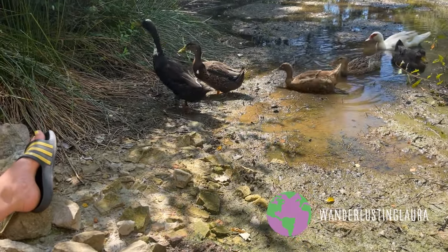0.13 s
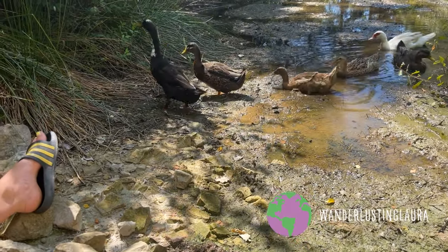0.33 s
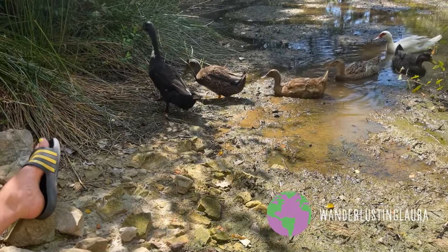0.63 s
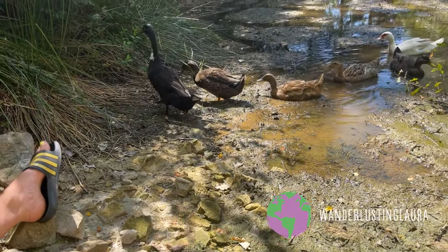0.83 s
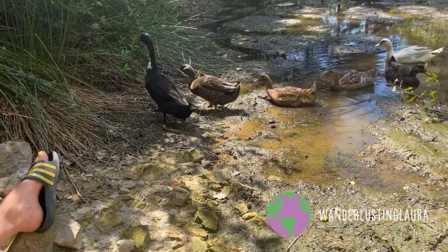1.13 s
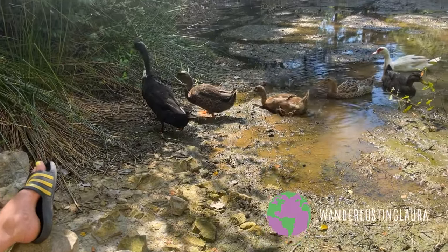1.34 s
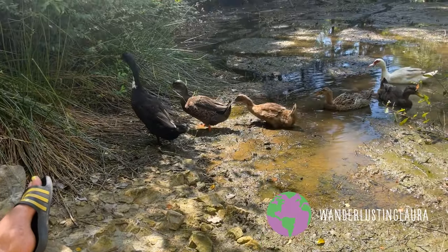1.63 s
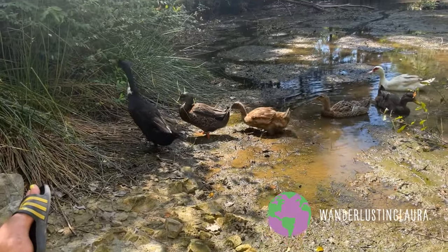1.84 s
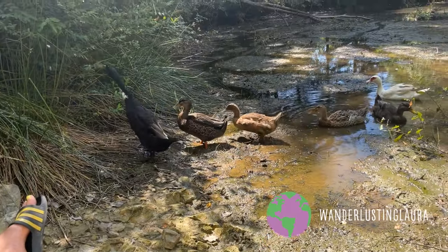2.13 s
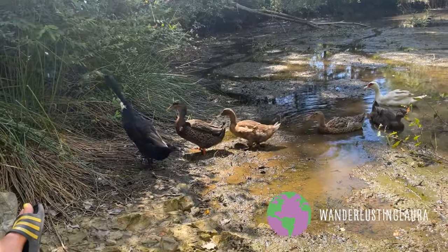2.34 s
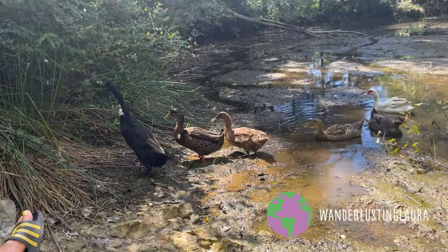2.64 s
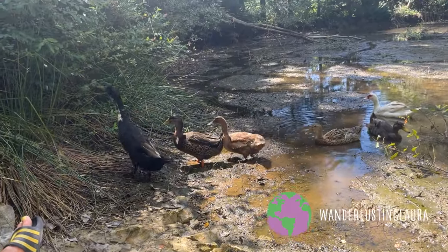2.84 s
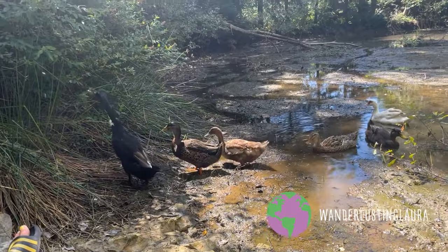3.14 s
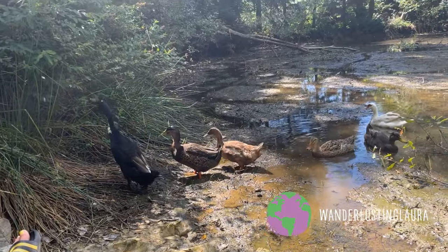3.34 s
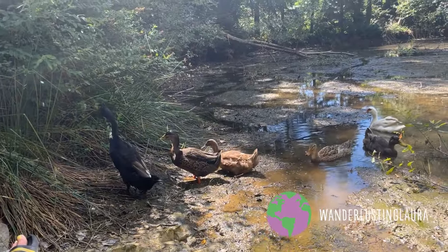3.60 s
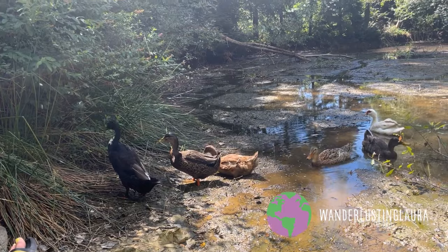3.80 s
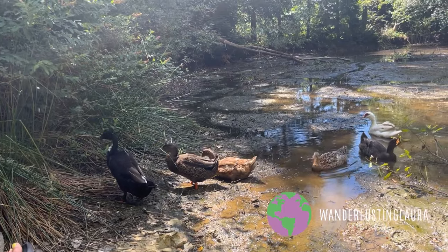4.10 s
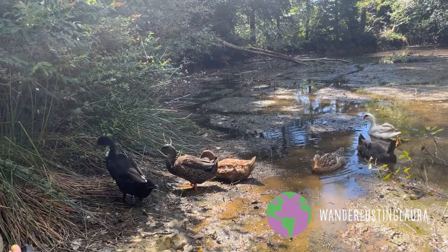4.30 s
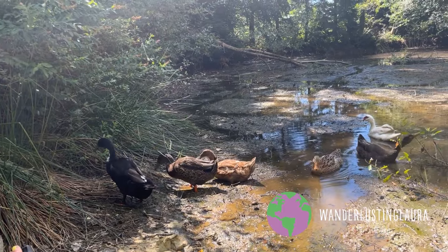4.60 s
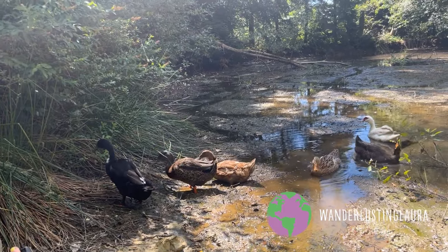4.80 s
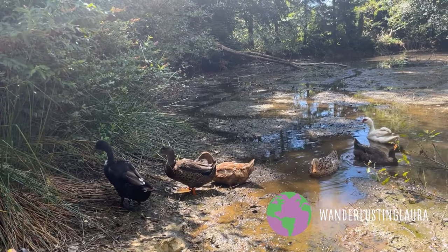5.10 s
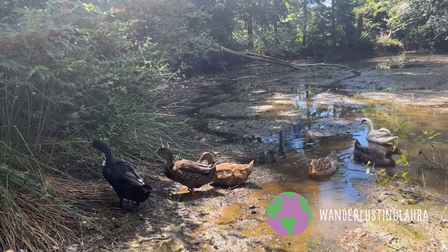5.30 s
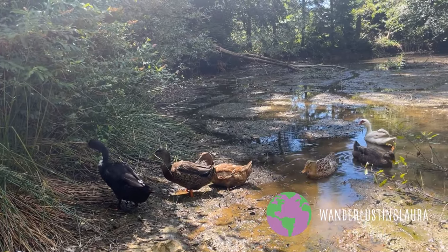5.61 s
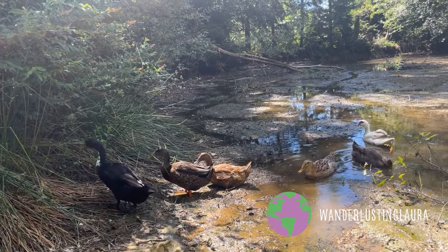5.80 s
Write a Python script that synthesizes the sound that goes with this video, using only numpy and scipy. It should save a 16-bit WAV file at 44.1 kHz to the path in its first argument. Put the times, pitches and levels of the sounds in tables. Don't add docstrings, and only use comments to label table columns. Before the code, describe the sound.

Several ducks a few steps away at a pond edge give short creaky quacks, closest together in the first two seconds, then sparser. Bills and feet slap, drip and squelch in mud and shallow water. Deep wind buffets the phone microphone strongly at first, drops to a lull from two seconds, then thumps again after about four. Thin outdoor hiss and faint insect trills lie behind.

```python
import sys
import numpy as np
from scipy import signal
from scipy.fft import rfft, irfft
from scipy.io import wavfile
from scipy.ndimage import uniform_filter1d

SR = 44100
rng = np.random.default_rng(int(sys.argv[2]) if len(sys.argv) > 2 else 0)


def gain_from_db(level_db):
    decades = np.asarray(level_db, float) / 20
    return 10 ** decades


def inscribe(sig):
    pcm = np.round(np.clip(np.atleast_2d(sig).T, -1, 1) * 32767)
    wavfile.write(sys.argv[1], SR, pcm.astype(np.int16))


N = 262395


def evened(x):
    return x / np.sqrt(np.mean(x ** 2) + 1e-20)


def read(points, hz):
    f, value = np.transpose(points)
    return np.interp(np.log(hz + 1), np.log(f + 1), value)


def add(mix, s, sound):
    part = mix[:, max(round(s * SR), 0):][:, :sound.shape[1]]
    part += sound[:, :part.shape[1]]


def sides(pan_db):
    return gain_from_db(np.array([pan_db / 2, -pan_db / 2]))


def resonate(x, hz, *widths_hz):
    turn = np.exp(2j * np.pi * np.cumsum(hz * np.ones(x.shape[-1])) / SR)
    for width_hz in widths_hz:
        r = np.exp(-np.pi * width_hz / SR)
        x = 2 * (turn * signal.lfilter([1 - r], [1, -r], x / turn)).real
    return x


def two_channels(size, shared_gain, own_gain):
    return shared_gain * rng.standard_normal(size) + own_gain * rng.standard_normal((2, size))


# f/Hz, correlation
LIKENESS = [(60, 0.93), (130, 0.73), (290, 0.67), (640, 0.26), (1410, 0.059), (3100, 0.15), (8600, 0.144),
            (15000, 0.046)]


def noise(colour_db, size, patchy_db, cells):
    hop = size // 4
    hz, s = np.fft.rfftfreq(size, 1 / SR), np.arange(N // hop + 5) * hop / SR
    a, b, c, d, patches = rng.standard_normal((len(s), len(hz), 5)).T
    patches = uniform_filter1d(patches, cells[0], 0)
    patches = evened(uniform_filter1d(patches, cells[1], 1))
    same = np.clip(read(LIKENESS, hz), -1, 1)[:, None]
    left = a + 1j * b
    right = same * left + np.sqrt(1 - same ** 2) * (c + 1j * d)
    level_db = colour_db(hz[:, None], s) + patchy_db * patches
    return np.array([left, right]) * gain_from_db(level_db), hz


def gust(s, peak_db, hz, cycles=2.49):
    u = np.linspace(0, 1, round(cycles / hz * SR))
    swell = np.sin(np.pi * u ** .6) ** 1.3 * (1 - np.exp(-(u / .06) ** 2))
    phase, skew = rng.uniform(0, 2 * np.pi), 0.87 * rng.standard_normal()
    turn = 2 * np.pi * cycles * (1.379 * u - 0.49 * u ** 2) + phase + np.array([[0], [skew]])
    wave = np.sin(turn) + 0.22 * np.sin(2.307 * turn) + 0.051 * (1 - u) * np.sin(3.874 * turn)
    return s, gain_from_db(peak_db) * swell * wave


# t/s, level/dB
WIND = [(0.0, -28.5), (0.23, -35.5), (0.95, -29), (1.34, -27), (1.8, -32.5), (2.0, -49.5), (2.3, -52.5),
        (2.62, -47.5), (3.3, -40.5), (3.7, -41.5), (4.14, -41.5), (4.361, -33.5), (5.0, -36.5),
        (5.45, -40.5), (5.95, -38.5)]
# f/Hz, level/dB per Hz
RUMBLE = [(13, -27), (22, 3.5), (43, -3), (69, 1), (104, -7.5), (230, -30), (363, -42), (450, -49),
          (580, -39), (990, -120)]
# t/s, peak level/dB, f/Hz
GUSTS = [(0.08, -15, 51), (0.159, -19, 52), (0.24, -18.5, 74), (0.42, -19.5, 47.3), (0.515, -15.5, 59.6),
         (0.626, -21, 71), (0.737, -12.5, 54.9), (0.78, -20, 76.4), (1.066, -26, 55), (1.161, -10.5, 65.7),
         (1.249, -20, 83.3), (1.31, -13.5, 49), (1.385, -15.5, 57.5), (1.469, -15.5, 53.4),
         (1.657, -20.5, 92.6), (1.698, -15, 55), (1.769, -12.5, 60.7), (3.22, -25.5, 69.2),
         (3.392, -24.5, 97), (3.487, -23, 81.5), (4.31, -24.5, 86), (4.432, -10.5, 59.7),
         (4.486, -21.5, 48.7), (4.678, -26, 78), (4.797, -9.5, 59.2), (4.93, -23.5, 53.3),
         (5.116, -21, 63.4), (5.207, -20.5, 59.9), (5.629, -23, 61), (5.784, -13.5, 64.8),
         (1.88, -36, 55.2), (1.945, -27.5, 75), (2.005, -32, 60), (2.126, -30.5, 70), (2.196, -32, 69),
         (2.36, -36.5, 60), (2.446, -29.5, 57), (2.515, -28, 77.6), (2.665, -26.5, 63), (2.84, -31, 88.8),
         (3.03, -33, 88), (3.334, -32.5, 75), (3.679, -35, 55.4), (3.738, -33, 60), (3.795, -29, 65),
         (3.944, -26, 81), (4.07, -33, 62), (4.166, -26, 66), (4.24, -32, 69.6), (5.329, -31, 60.5),
         (5.481, -30, 71), (.9, -25, 71), (.98, -21, 75), (3.58, -35, 81), (4.58, -32, 65),
         (5.029, -33, 60.6), (5.551, -29, 63.5), (5.88, -32, 60)]


def wind():
    s, strength_db = np.transpose(WIND)
    z, hz = noise(lambda hz, t: read(RUMBLE, hz) + 0 * t, size=2048, patchy_db=1.5, cells=(6, 8))
    x = evened(signal.istft(z, nperseg=2048, noverlap=1536)[1][:, :N])
    x = evened(x + x[::-1] / 6)
    x *= gain_from_db(np.interp(np.arange(N) / SR, s, strength_db) + 5.0)
    for row in GUSTS:
        add(x, *gust(*row))
    low_cut = signal.butter(3, 38, "high", fs=SR, output="sos")
    return signal.sosfilt(low_cut, x) * sides(-3.05)[:, None]


# t/s, level/dB
STIR = [(0.0, 5), (0.89, 2.5), (1.06, 6), (1.19, 10), (1.31, 7), (1.44, 12), (1.72, 8.5), (1.94, 7),
        (2.17, 8), (2.47, 3.5), (2.82, 6), (3.02, 5.5), (3.46, 8.5), (3.65, 2.5), (4.22, 5), (4.54, 2.5),
        (5.6, 7.5), (5.95, 6)]
# f/Hz, level/dB per Hz
AIR = [(82, -45), (140, -3), (200, 12), (508, -7.5), (595, -8), (1290, -9.5), (4590, -21), (5480, -21.5),
       (6560, -27), (9370, -25), (11400, -30.5), (12400, -49), (14500, -39.5), (16000, -49)]
# f/Hz, left-right level/dB
SIDES = [(500, -0.5), (5000, 4), (15000, -3)]


def air():
    s, stir_db = np.transpose(STIR)
    hiss_db, hiss_share, fizz_share = 7.5, 0.18, 1.46

    def top(hz):
        return np.clip(np.log2(hz / 2200 + 1e-9), 0, 1)

    def colour_db(hz, t):
        above_rumble = np.clip(np.log2(hz / 250 + 1e-9), 0, 1)
        middle_db = np.interp(t, s, hiss_db + hiss_share * stir_db)
        fizz_db = np.interp(t, s, fizz_share * stir_db)
        return read(AIR, hz) + above_rumble * ((1 - top(hz)) * middle_db + top(hz) * fizz_db)

    z, hz = noise(colour_db, size=512, patchy_db=1.6, cells=(6, 12))
    top_and_dip_db = 13 * (hz > 13800) - 10 * np.exp(-((hz - 6600) / 200) ** 2)
    z *= gain_from_db(top_and_dip_db)[:, None]
    z *= sides(read(SIDES, hz))[:, :, None]
    flicker_db = .9 * rng.exponential(1, z.shape[2])
    z *= gain_from_db(flicker_db * top(hz)[:, None])
    return gain_from_db(-39.0) * signal.istft(z, nperseg=512, noverlap=384)[1][:, :N] / 16


# start t/s, end t/s, level/dB
TRILLS = [
    (.37, .6, -68),
    (2.56, 2.8, -70),
    (3.14, 3.36, -71),
    (4.26, 4.5, -69),
    (5.08, 5.3, -70),
]


def trill(start, end, level_db):
    t = np.arange(0, end - start, 1 / SR)
    strokes = np.maximum(np.sin(2 * np.pi * 90 * t), 0) + 1.6
    hz = 7300 - 350 * np.sqrt(t / t[-1])
    note = resonate(strokes * two_channels(len(t), 1, 1), hz, 170, 170)
    fade = gain_from_db(level_db - 9 * t / t[-1]) * signal.windows.tukey(len(t), .2)
    return start, evened(note) * fade


# t/s, peak level/dB, f/Hz, length/s, relative glide over the length
BUBBLES = [
    (0.115, -40, 863, 0.0287, 0.31),
    (0.463, -43, 1166, 0.025, -0.24),
    (0.485, -39, 685, 0.0227, -0.084),
    (0.6, -35.5, 754, 0.0067, 0.27),
    (1.405, -29.5, 820, 0.0033, 0.193),
    (1.502, -44.5, 940, 0.029, -0.326),
    (1.883, -27.5, 748, 0.0017, -0.2),
    (1.916, -27, 882, 0.021, -0.226),
    (3.542, -43, 1960, 0.0062, 0.063),
    (5.74, -46.5, 1249, 0.0222, -0.00095),
]
# t/s, peak level/dB, f/Hz, length/s, relative glide
DRIPS = [(.342, -49, 2600, 0.0044, -.1), (.399, -46, 1340, .006, 0.14), (0.469, -48.5, 2300, 0.0093, 0.25),
         (.756, -50, 3300, 0.0051, 0.028), (1.019, -42.5, 1350, .006, 0.098), (1.121, -42, 2700, .005, .04),
         (1.203, -44.5, 2800, 0.015, -0.0016), (1.258, -45, 2670, 0.0058, 0.023),
         (1.262, -44, 1213, 0.007, 0.12), (2.415, -50, 3600, .004, 0.034), (2.662, -49, 1530, 0.011, .05),
         (2.697, -40, 1800, 0.0066, 0.072), (2.85, -46.5, 2890, 0.00385, 0.18),
         (2.906, -43.5, 2094, .007, .1), (4.69, -47.5, 2600, .007, 0.068), (4.857, -33, 1930, 0.0033, 0.28),
         (4.861, -34.5, 2430, 0.006, 0.24), (4.99, -43, 2450, .01, 0.12), (5.003, -49, 3600, 0.0035, 0.11),
         (5.036, -53, 3660, 0.0055, .03), (5.495, -49, 2500, 0.0108, 0.1), (5.513, -53, 2900, .008, 0.013),
         (5.618, -50, 2420, 0.013, 0.23), (5.707, -46.5, 4900, 0.0049, 0.0056),
         (5.87, -47, 3373, 0.0069, 0.078), (5.87, -44, 1810, .006, .05),
         (1.007, -33.5, 3550, 0.0051, 0.014), (1.008, -31, 2110, 0.0046, 0.026),
         (2.824, -47.5, 3600, 0.0063, 0.011), (2.825, -47, 4500, 0.0047, .03),
         (2.917, -26, 3630, .006, 0.054), (2.7, -51, 3800, 0.0072, 0.048), (2.098, -42.5, 1600, 0.0054, .1),
         (2.262, -48, 3400, .01, 0.037), (1.885, -50, 1910, 0.035, .5), (.378, -47, 2300, 0.0048, -0.087),
         (5.136, -51, 2700, .005, .1), (5.212, -50, 5300, 0.0049, 0.11), (.583, -49.5, 2000, 0.01, .15),
         (3.429, -35, 3700, 0.0037, 0.011)]


def bubble(s, peak_db, hz, length, glide):
    u = np.linspace(0, 1.4, round(abs(length) * 1.424 * SR) + 2)
    turn = 2 * np.pi * hz * length * u * (1 + glide * u / 2)
    swell = np.sin(np.pi * u / 1.4) ** 2.0
    return s - .002, gain_from_db(peak_db) * swell * np.sin(turn + np.array([[0], [.4]]))


# t/s, peak level/dB, cavity f/Hz
SQUELCHES = [(.06, -40, 593), (0.148, -35, 555), (0.19, -33.5, 452), (0.929, -29.5, 594), (1.461, -33, 695),
             (2.615, -34, 570), (2.633, -36, 516), (2.673, -34.5, 816), (2.916, -38, 750),
             (3.341, -43, 467), (3.372, -36.5, 298), (3.437, -30.5, 870), (3.491, -40, 340),
             (4.046, -40, 318), (4.174, -32.5, 537), (4.596, -41.5, 340), (4.878, -37, 376)]


def squelch(s, peak_db, hz):
    t = np.arange(round(0.034 * SR)) / SR
    puff = two_channels(len(t), 0.75, 1) * t / .004 * np.exp(-t / 0.0054)
    cavity = resonate(resonate(puff, hz * (1 - 12.2 * t), 240), hz, 670)
    body = cavity + .5 * resonate(resonate(puff, 210, 1100), 210, 1100)
    return s - .002, gain_from_db(peak_db + 3.0) * body / np.abs(body).max()


# t/s, peak level/dB, ring f/Hz, spray level above 5 kHz in steps of 2.02 dB
SLAPS = [(0.2344, -37, 3310, -38), (1.007, -33.5, 2090, -27.5), (1.008, -37, 3420, -20),
         (1.203, -31.5, 5860, -3), (1.3248, -41.5, 3830, 0.5), (1.334, -30.5, 2500, -23),
         (1.359, -29, 1400, -27.5), (1.369, -46.5, 2320, 3.5), (1.7906, -25, 2440, -11),
         (2.174, -36.5, 2870, -2.5), (2.2116, -19, 2950, -4), (2.2136, -21, 1920, -27),
         (2.4025, -39, 1670, -10), (2.918, -19, 2680, -6), (3.1156, -55, 2080, 4), (3.3725, -27, 3600, -9),
         (3.3903, -28.5, 2650, -7), (3.402, -28.5, 2730, -22), (3.414, -29.5, 2040, -25),
         (3.4294, -21, 3760, -39), (3.4379, -18.5, 1750, -4), (3.4672, -30.5, 1600, -34),
         (3.959, -55, 3200, 3.5), (4.218, -51, 2260, 2), (4.7008, -36.5, 2950, -33),
         (4.754, -45, 3230, -0.5), (4.8564, -34.5, 1900, -4.5), (4.8624, -43, 4840, -27.5),
         (5.0035, -40.5, 2500, -2), (5.5117, -40.5, 2900, -2)]
# t/s, peak level/dB, ring f/Hz
DABS = [(0.02, -43, 5620), (0.3017, -41, 2840), (0.3363, -39, 3100), (0.3576, -45, 3920),
        (0.878, -40, 4700), (1.327, -33.5, 1740), (1.8124, -40, 4500), (2.0518, -38.5, 3300),
        (2.154, -43.5, 2760), (2.262, -52, 3300), (2.2812, -42, 2200), (2.3105, -38, 3310),
        (2.6717, -42.5, 3370), (2.825, -40.5, 1870), (2.9882, -38.5, 1870), (4.5662, -41.5, 3240),
        (4.768, -39, 2800), (4.979, -44, 2080), (5.1126, -46, 1890), (5.1266, -41.5, 1990),
        (3.358, -43, 3340), (5.3832, -41, 2090), (5.4872, -37, 2060), (5.6091, -38, 2264),
        (5.6294, -43, 1940), (5.705, -43.5, 3600), (1.5618, -43, 5230), (4.745, -46, 3520)]
# t/s, peak level/dB
FLICKS = [(.085, -54.5), (1.131, -48.5), (1.895, -65.5), (2.196, -41.5), (3.612, -56), (3.852, -57),
          (4.044, -58), (4.075, -52.5), (4.26, -57.5), (5.788, -49), (2.605, -64), (1.852, -56),
          (3.68, -63), (3.985, -58), (3.6, -55)]
SLAP_T60_S, DAB_T60_S = 0.016, 0.0087
DAB_SPRAY_DB, FLICK_SPRAY_DB, FLICK_HZ = -9, 2, 4160


def slap(s, peak_db, hz, spray_db, t60_s):
    t = np.arange(round(.09 * SR)) / SR
    attack = 1 - np.exp(-(t / 0.0027) ** 3)
    sizzle = gain_from_db(-33.5 - 60 * t / 0.2)
    burst = attack * (gain_from_db(-60 * t / max(t60_s, .008)) + sizzle)
    drops = two_channels(len(t), 1, 0.53) * burst
    rising_hz = 0.92 * hz + 40000 * np.minimum(t, .012)
    wide = min(gain_from_db(peak_db + 26.5), 4.0)
    ring = resonate(drops, rising_hz, 1450, 850)
    ring += 0.18 * wide * resonate(drops, 3560, 4000, 4000)
    ring += 0.06 * wide * resonate(drops, 1000, 850, 850)
    spray = signal.sosfilt(signal.butter(4, 5000, "high", fs=SR, output="sos"), drops)
    ring /= np.abs(ring).max()
    spray /= np.abs(spray).max()
    lean = sides(0.5 + 0.35 * rng.standard_normal())[:, None]
    return s - .0018, gain_from_db(peak_db + 2.5) * (ring + gain_from_db(2.02 * spray_db) * spray) * lean


# t/s, length/s, level/dB, throat f/Hz, relative climb over the call
RASPS = [(0.943, 0.058, -42.5, 1634, .1), (1.057, 0.049, -41, 1695, .2), (1.097, 0.0313, -43.5, 1730, .02),
         (1.197, 0.061, -39.5, 1620, 0.33), (1.466, .04, -50, 1487, .04), (1.688, .03, -43.5, 1870, .04),
         (4.39, .055, -47, 1710, .04), (2.858, 0.015, -44, 1680, 0.37), (2.89, 0.062, -48, 1360, .04),
         (5.587, 0.025, -51, 1680, .04), (5.69, 0.063, -46.5, 1695, .05)]


def rasp(start, length, level_db, throat_hz, climb, beats_per_s=88, depth=0.26):
    t = np.arange(start - .005, start + length + 0.00275, 1 / SR)
    along = np.linspace(-1, 1, len(t))
    throb = 1 + depth * np.cos(2 * np.pi * beats_per_s * t)
    breath = two_channels(len(t), 1, .5) * throb
    hz = throat_hz * (1 + climb * along / 2)
    voice = resonate(breath, hz, 340, 403)
    voice += gain_from_db(-17.5) * resonate(breath, 1.33 * hz, 200, 200)
    ends_db = -6 * abs(along)
    shape = gain_from_db(level_db + ends_db) * signal.windows.tukey(len(t), .3)
    return t[0], evened(voice) * shape * sides(6.7)[:, None]


# first pulse t/s, last pulse t/s, effort level/dB, low throat f/Hz, middle f/Hz
QUACKS = [
    (0.173, 0.226, -35, 1330, 1547),
    (0.898, 0.939, -31, 1240, 1484),
    (1.121, 1.189, -35.5, 1410, 1760),
    (1.427, 1.467, -33.5, 1230, 1415),
    (1.617, 1.692, -34.5, 1195, 1450),
    (1.964, 2.019, -36, 1255, 1610),
    (2.71, 2.764, -34, 1204, 1580),
    (4.049, 4.101, -35, 1306, 1720),
    (4.402, 4.432, -43, 996, 1744),
]
MUTTERS = [
    (.622, 0.675, -27.5, 1290, 1513),
    (2.445, 2.501, -28.5, 1362, 1870),
    (3.794, 3.837, -33.5, 1240, 1550),
]
HONKS = [
    (0.411, .459, -30.5, 1370, 1555),
    (0.853, .893, -40.5, 1050, 1804),
    (1.716, 1.773, -38.5, 1310, 1740),
]
CLUCKS = [
    (4.899, 4.939, -33.5, 1415, 1830),
    (5.171, 5.223, -34.5, 1350, 1800),
]
# f/Hz, level/dB, left-right level/dB
HEAD = [(2800, -19.5, 1.7), (3600, -33, 17), (4500, -33, 13), (5300, -29.5, 8.1)]
OPEN_BILL = dict(mid_db=0.7, bill_db=-6, bill_hz=2193, first_db=-6, top=.5, nasal_db=0)
SHUT_BILL = dict(mid_db=-4.5, bill_db=-16.5, bill_hz=2200, first_db=-5.5, top=.5, nasal_db=-2)
WIDE_BILL = dict(mid_db=-1.5, bill_db=-3.5, bill_hz=2388, first_db=-9.5, top=.5, nasal_db=10)
SHORT_BILL = dict(mid_db=-4.5, bill_db=-8, bill_hz=2197, first_db=-1.5, top=-0.24, nasal_db=0.1)


def quack(first, last, effort_db, low_hz, mid_hz, mid_db, bill_db, bill_hz, first_db, top, nasal_db):
    pulse_gap_s, jitter_s, jitter_db, last_db = .0128, .0007, 1.8, -11
    rise_s, fall_s, slowing = 0.003, 0.0025, 0.0998
    u = np.linspace(0, 1, round((last - first) / pulse_gap_s) + 1)
    growing_db = first_db * abs(1 - u / top) ** 2.0
    fading_db = last_db * abs((u - top) / (1 - top)) ** 1.8
    arch_db = np.where(u < top, growing_db, fading_db)
    beats = first + (last - first) * ((1 - slowing) * u + slowing * u ** 3.48)
    uneven = np.clip(rng.standard_normal((len(u), 2)), -1.5, 1.5) * (u > 0)[:, None]
    beats = beats + jitter_s * uneven[:, 0]
    arch_db = arch_db + jitter_db * uneven[:, 1]
    t = np.arange(-500, 900) / SR
    out = np.zeros((2, round((last - first + .05) * SR)))
    modes = [(low_hz, 0, 0), (mid_hz, mid_db, 4.0), (bill_hz, bill_db, 2.5)] + HEAD
    lags = 1.03 * rng.standard_normal(len(modes))
    for beat, opening, below_db in zip(beats, np.sin(np.pi * u), arch_db):
        wobble = rng.standard_normal((len(modes), 3))
        hiss = uniform_filter1d(rng.standard_normal((len(modes), 2, len(t))), 40, axis=2)
        hiss = uniform_filter1d(hiss, 30, axis=2) * 8
        pulse = np.zeros((2, len(t)))
        for (hz, db, lean_db), lag, (dhz, ddb, dt), grit in zip(modes, lags, wobble, hiss):
            late = t - .0032 * min(hz / low_hz - 1, 1.2) - .0008 * np.clip(dt, -1.5, 1.5)
            swell = 1 / (np.exp(-late / rise_s) + np.exp(late / fall_s)) ** 2.2
            swell += 0.015 * np.exp(-((late - .004) / 0.006) ** 2)
            open_hz = hz * (1 + 0.075 * (opening - .7) + 0.013 * dhz)
            port_lag = np.array([[lag / 2], [-lag / 2]])
            turn = 2 * np.pi * open_hz * t + 2 * np.pi * 14000 * t ** 2 + port_lag
            breath = .14 * (hz / low_hz) ** 1.2
            db += 2 * ddb + 1.8 * (opening - 1) * (hz > 2000) + nasal_db * (hz > 4000)
            tone = np.sin(turn) + breath * grit * np.cos(turn)
            pulse += gain_from_db(db) * sides(lean_db)[:, None] * swell * tone
        add(out, beat - first, gain_from_db(effort_db + below_db + 16.5) * pulse)
    return first + t[0], out


def banks(x):
    t = np.arange(round(.2 * SR)) / SR
    sparse = rng.random((2, len(t))) < .04
    taps = rng.standard_normal((2, len(t))) * sparse * (t > .003)
    taps *= gain_from_db(-60 * t / .03) + gain_from_db(-27 - 60 * t / .3)
    taps = signal.lfilter([.4], [1, -.6], taps)
    return signal.fftconvolve(x[::-1], taps / np.linalg.norm(taps[0]), axes=1)[:, :N]


# f/Hz, level/dB
PORTS = [(5200, 2), (6500, 0), (7600, 11.5), (11200, 7.5), (12600, 2.5), (14500, 11.5)]


def ports(x, lag_s=1.2e-5):
    hz = np.fft.rfftfreq(N, 1 / SR)
    late = 2 * np.pi * hz * lag_s + 1.5 * np.clip((hz - 10500) / 2500, 0, 1)
    right_late = np.exp(-1j * late * np.array([[0], [1]]))
    return irfft(rfft(x) * right_late * gain_from_db(read(PORTS, hz)), N)


def scene():
    pond = np.zeros((2, N))
    for source, table in ((trill, TRILLS), (bubble, BUBBLES), (bubble, DRIPS), (squelch, SQUELCHES),
                          (rasp, RASPS)):
        for row in table:
            add(pond, *source(*row))
    for row in SLAPS:
        add(pond, *slap(*row, SLAP_T60_S))
    for row in DABS:
        add(pond, *slap(*row, DAB_SPRAY_DB, DAB_T60_S))
    for row in FLICKS:
        add(pond, *slap(*row, FLICK_HZ, FLICK_SPRAY_DB, DAB_T60_S))
    for table, bill in ((QUACKS, OPEN_BILL), (MUTTERS, SHUT_BILL), (HONKS, WIDE_BILL), (CLUCKS, SHORT_BILL)):
        for row in table:
            add(pond, *quack(*row, **bill))
    echoes = gain_from_db(-14) * banks(pond)
    return ports(pond + echoes) + air() + wind()


def band_limit(x):
    return signal.sosfilt(signal.butter(12, 16050, fs=SR, output="sos"), x)


def record(dry):
    edge = signal.firwin(401, 15900, window=("kaiser", 6), fs=SR)
    mix = signal.oaconvolve(dry, edge[None], "same")
    return band_limit(mix)


dry = scene()
out = record(dry)
inscribe(out)
```